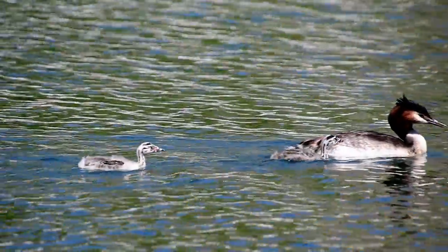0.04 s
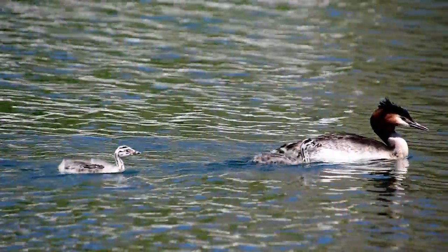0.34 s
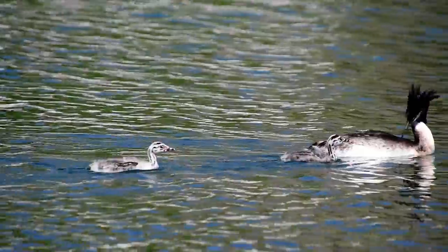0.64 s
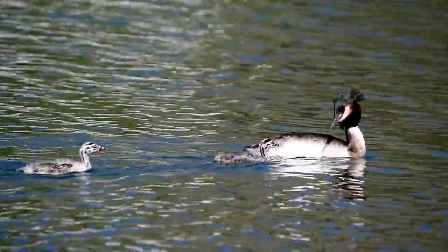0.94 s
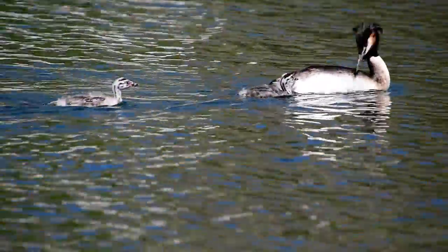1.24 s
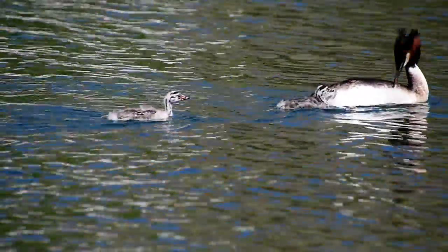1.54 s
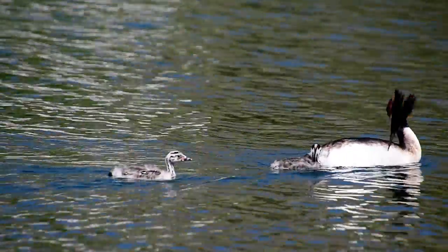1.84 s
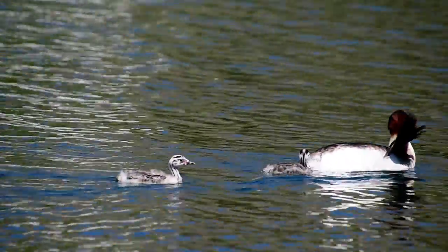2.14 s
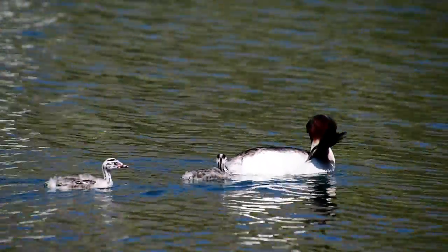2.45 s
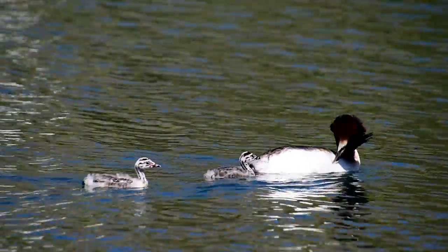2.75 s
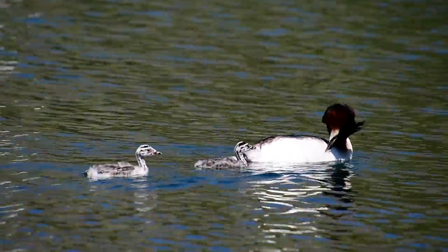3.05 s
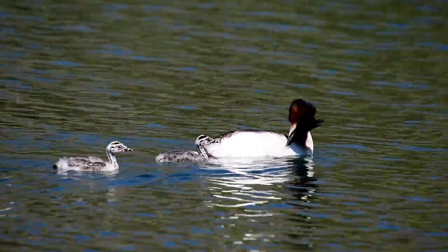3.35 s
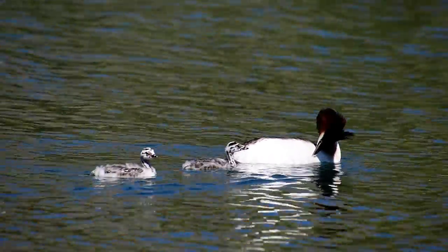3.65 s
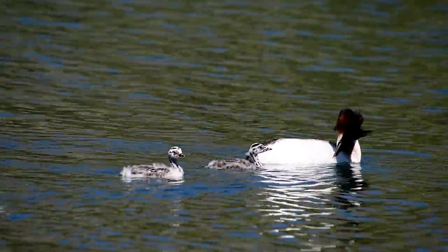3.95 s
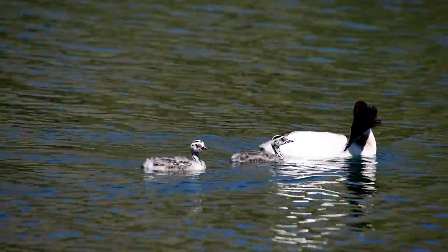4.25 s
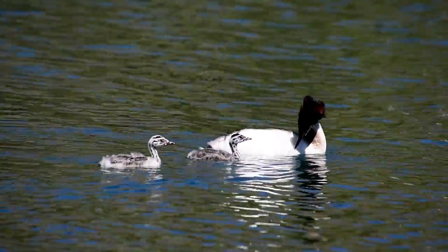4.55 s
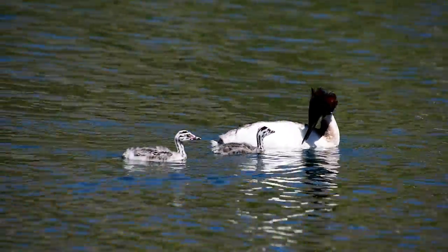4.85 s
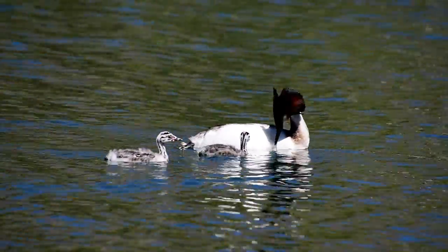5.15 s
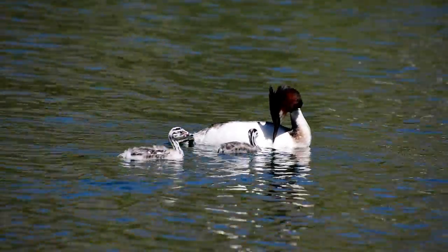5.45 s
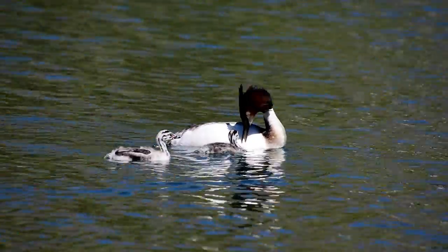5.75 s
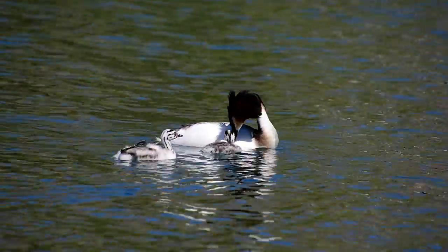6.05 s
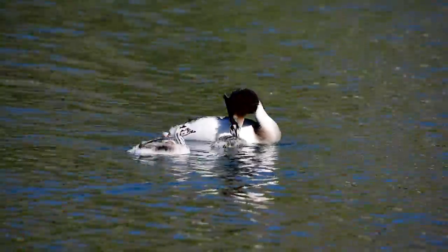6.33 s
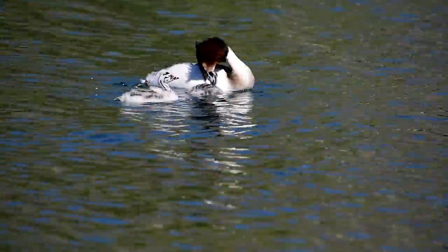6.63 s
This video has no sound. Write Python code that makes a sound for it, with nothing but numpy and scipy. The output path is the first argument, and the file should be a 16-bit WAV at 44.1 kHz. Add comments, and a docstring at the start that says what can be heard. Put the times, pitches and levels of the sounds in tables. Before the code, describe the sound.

On a lake, a grebe chick close by gives a sharp, high peep about once a second, and another answers more faintly further out. Soft nasal waterbird whines and distant songbird chirps, trills and buzzes continue throughout. Early on, the hand-held microphone rustles, bumps and clicks loudly twice, then hisses briefly. A faint far motor slowly grows under the quiet outdoor hush.

```python
"""Grebe chicks beg on a lake: one peeps sharply close by, another further out.
Waterbirds whine across the water; songbirds chip, trill, wheeze and flute on the bank.
Each call is a wavering membrane tone with a diffuse echo off water and banks.
A far motor hums under the outdoor hush. The hand-held camera rustles, bumps,
clicks (twice loudly) and hisses for a moment."""
import sys
import numpy as np
from scipy import signal
from scipy.fft import rfft, irfft, next_fast_len
from scipy.io import wavfile
from scipy.ndimage import uniform_filter1d

SR = 44100
rng = np.random.default_rng(int(sys.argv[2]) if len(sys.argv) > 2 else 0)


def generate_wav(signal):
    """Clip the signal to [-1, 1] and save it as 16-bit WAV at the path in sys.argv[1]."""
    frames = np.transpose(np.atleast_2d(signal))
    scaled = np.clip(frames, -1, 1) * 32767
    pcm = np.round(scaled).astype(np.int16)
    wavfile.write(sys.argv[1], SR, pcm)


N = 295029
T = np.arange(N) / SR

# direction of the far birds: f/Hz, left minus right/dB
BANK_PAN = [(500, -4), (1300, -9), (1600, 5), (2000, -14.5), (2600, -18), (3200, 12), (3900, 3.5),
            (4450, -12), (5200, -6), (7000, -1)]
# stereo width of diffuse noise: f/Hz, side minus mid/dB
DIFFUSE_SIDE = [(60, -106), (250, -103), (600, -10), (1200, 0), (2000, 4), (15000, -1)]


def undb(db):
    return 10 ** (np.asarray(db) / 20)


def unit(x):
    return x / np.sqrt(np.mean(x ** 2))


def curves(rows, at):
    """Table columns, interpolated along the first."""
    first, *columns = np.transpose(rows)
    return [np.interp(at, first, c) for c in columns]


def gains(points, size):
    """Gain per FFT bin from (f/Hz, level/dB) points."""
    hz, db = np.transpose(points)
    bin_hz = np.arange(size // 2 + 1) * SR / size
    return undb(np.interp(np.log(bin_hz + 1), np.log(hz), db))


def colour(x, points):
    """Filter by (f/Hz, level/dB) points."""
    size = next_fast_len(x.shape[-1] + 4096, True)
    return irfft(rfft(x, size) * gains(points, size), size)[..., :x.shape[-1]]


def noise(points):
    return unit(colour(rng.standard_normal(N), points))


def walk(rate_hz):
    """Random drift, spread near 1."""
    knots = rng.standard_normal(8192)
    return np.interp(T * rate_hz, np.arange(len(knots)), knots)


def add(out, start_s, x):
    i = int(start_s * SR)
    x = x[max(-i, 0):max(N - i, 0)]
    out[max(i, 0):max(i, 0) + len(x)] += x


def envelope(t, length_s, attack_s, release_s):
    return np.clip(t / attack_s, 0, 1) * np.clip((length_s - t) / release_s, 0, 1)


def swells(rows, attack_s, release_s, fade_db_per_s=0):
    """Gain over time from (t/s, length/s, level/dB) rows."""
    gain = np.zeros(N)
    for start_s, length_s, db in rows:
        t = T - start_s
        fade_db = fade_db_per_s * np.clip(t, 0, length_s)
        gain += envelope(t, length_s, attack_s, release_s) * undb(db - fade_db)
    return gain


def ports(x, pan, lag_samples):
    """Two microphone ports, shaded by frequency; the left lags."""
    left = colour(x, [(hz, db / 2) for hz, db in pan])
    right = colour(x, [(hz, -db / 2) for hz, db in pan])
    return np.array([np.interp(T - lag_samples / SR, T, left), right])


def shore(x, wet_db, t60_s):
    """Water and banks scatter a call into a short diffuse tail."""
    t = T[:SR // 2]
    tail = rng.standard_normal((2, len(t))) * undb(-60 * t / t60_s) * np.clip(t / 0.0009, 0, 1)
    tail /= np.sqrt(np.sum(tail ** 2, axis=1, keepdims=True))
    return undb(wet_db) * signal.fftconvolve(x[None], tail, axes=1)[:, :N]


def syrinx(hz, db, overtone_db, slope_db, jitter, flutter_db, harmonics=3):
    """Trembling membrane: pitch and level waver; overtones step by slope_db each."""
    size = len(hz)
    drift = uniform_filter1d(uniform_filter1d(rng.standard_normal((2, SR // 4)), size=60), size=60)
    tremble = unit(drift[0])[:size]
    flutter = unit(uniform_filter1d(drift[1], size=200))[:size]
    hz = uniform_filter1d(hz, size=130) * (1 + jitter * tremble)
    phase = 2 * np.pi * np.cumsum(hz) / SR
    tone = np.sin(phase)
    for k in range(2, harmonics + 1):
        tone += undb(overtone_db + slope_db * (k - 2.5)) * np.sin(k * phase) * (k * hz < SR / 2)
    gate = signal.windows.tukey(size, min(0.0028 * SR / size, 1))
    return np.sqrt(2) * tone * undb(db + flutter_db * flutter) * gate


def slur(length_s, start_hz, end_hz, db, edge_db, jitter, arch=0.0294):
    """Songbird note: a glide bowed upward by the share arch, ends lowered by edge_db."""
    share = np.linspace(0, 1, int(length_s * SR))
    edge = (2 * share - 1) ** 2
    hz = (start_hz + (end_hz - start_hz) * share) * (1 + arch * (1 - edge))
    return syrinx(hz, db - edge_db * edge, overtone_db=-42, slope_db=-5, jitter=jitter, flutter_db=4)


def hush():
    """Outdoor noise, mono in the bass."""
    spectrum = [(25, -20), (40, -6), (76, 0.5), (134, -3), (185, 4.5), (236, -4), (363, -3.5), (624, -10.5),
                (988, -6.5), (2410, -13), (3920, -8.5), (5430, -18.5), (7310, -23.5), (15500, -25)]  # f/Hz, level/dB
    mid = noise(spectrum)
    side = colour(noise(spectrum), DIFFUSE_SIDE)
    return np.array([mid + side, mid - side]) * undb(-53 + 0.87 * walk(5.1))


def motor():
    """Far motor, slowly growing: shaft speed wanders, the air makes it swell and fade."""
    levels = [(0, -71.5, -82), (2.7, -60.5, -54.5), (4.4, -65.5, -55), (5, -59, -53), (6.69, -56, -48)]  # t/s, hum/dB, drone/dB
    hum_lines = [(92, -0.35), (186, -1.2)]  # f/Hz, level/dB
    drone_spectrum = [(100, -29), (270, -1.5), (480, -11), (620, -5.5), (750, 5), (900, -0.5), (1150, -13),
                      (1600, -20), (4000, -37.5)]  # f/Hz, level/dB
    hum_db, drone_db = curves(levels, T)
    shaft_s = np.cumsum(1 + 0.0095 * walk(9)) / SR
    hum = sum(np.sin(2 * np.pi * hz * shaft_s) * undb(db + 1.05 * walk(18)) for hz, db in hum_lines)
    drone = noise(drone_spectrum) * undb(drone_db + 2.8 * walk(24))
    return hum * undb(hum_db) + ports(drone, [(300, 9), (750, -4), (1500, -8.5)], lag_samples=3.2)


def chorus(count=260):
    """Many far birds: random slurs, their echo and a wash of farther song."""
    levels = [(0, -41.5), (.4, -49.5), (.8, -51), (1.6, -45), (2, -51), (2.6, -53.5), (3.4, -51.5),
              (5.2, -45.5), (5.8, -51.5), (6.69, -43.5)]  # t/s, level/dB
    wash_spectrum = [(1500, -15), (2700, 3), (3300, 3), (4100, 8), (4800, -1), (5600, -4.5), (6300, -33),
                     (7200, -38), (10000, -45)]  # f/Hz, level/dB
    slurs = np.zeros(N)
    for when, pitch, glide, span, distance in rng.random((count, 5)):
        along = np.linspace(-1, 1, int((.018 + .035 * span) * SR))
        hz = 3200 * 2 ** (1.05 * pitch + .5 * (glide - .65) * along - .12 * along ** 2)
        db = -5 * distance - 5 * along ** 2
        note = syrinx(hz, db, overtone_db=-35, slope_db=-15, jitter=.01, flutter_db=2.5)
        add(slurs, when * T[-1], note)
    heard = ports(slurs, BANK_PAN, lag_samples=6) + shore(slurs, wet_db=1, t60_s=.5)
    voices = unit(colour(heard, [(2500, -3), (4000, 1), (6300, -2.5), (7200, -17), (9000, -30)]))
    wash = unit(colour(rng.standard_normal((2, N)), wash_spectrum))
    return (undb(-3) * voices + undb(-4.5) * wash) * undb(curves(levels, T)[0])


def chips():
    """Quick single songbird slurs."""
    notes = [(0, 0.029, 3950, 4470, -46), (0.296, 0.013, 3660, 3790, -43), (0.46, 0.031, 2600, 2634, -46.5),
             (0.593, 0.051, 5320, 3460, -46.5), (0.769, 0.031, 3910, 4450, -47.5),
             (1.167, 0.05, 2050, 2200, -50.5), (2.615, 0.045, 1305, 1194, -51.5),
             (3.016, .035, 3800, 3490, -42.5), (3.02, 0.044, 2064, 2300, -52),
             (5.09, 0.021, 5600, 5520, -40), (5.642, 0.027, 3950, 5000, -47)]  # t/s, length/s, start/Hz, end/Hz, level/dB
    out = np.zeros(N)
    for start_s, length_s, start_hz, end_hz, db in notes:
        add(out, start_s, slur(length_s, start_hz, end_hz, db, edge_db=4, jitter=0.013))
    return ports(out, BANK_PAN, lag_samples=4) + shore(out, wet_db=-4, t60_s=0.22)


def near_chick(whistle_s=.035):
    """An overtone-rich lead-in leaps to a loud whistle, drops and ends in a warble."""
    # peep shape: stage (0 start, 1 leap, 2 drop, 3 end), f/Hz, level/dB, overtones/dB
    contour = [(0, 3120, -32.5, 7.5), (.85, 3480, -12, -8.5), (1.2, 4610, -3, -17.5),
               (1.85, 4690, -5, -16.5), (2.07, 3530, -14, -15), (2.16, 4380, -10, -8),
               (2.35, 3400, -8, -26), (2.78, 3950, -10, -17), (3, 3000, -10.5, -22)]
    # t/s, lead-in/s, tail/s, level/dB, lead-in gain/dB, lead-in overtone slope/dB,
    # later overtone gain/dB, roughness/0-1
    peeps = [(0.078, 0.051, 0.068, -33.5, 3, -9, -4, 0.74),
             (1.774, 0.05, 0.061, -28, 1.5, -14.5, 2.5, 0.28),
             (3.123, .054, 0.055, -30, 5, -17.5, -2.5, 0.32), (4.223, 0.045, 0.058, -32, 4, -15.5, 0, 0.52),
             (5.423, .05, 0.061, -40, 9, -18.5, -0.5, 0.79), (6.533, .048, 0.066, -24.5, 5, 5.5, 1.5, 0.56)]
    throat = [(4700, -1), (5600, 3.5), (6650, 0), (7800, -7), (9400, 0), (10000, -3), (11000, -5.5),
              (15000, -13)]  # throat and beak resonances: f/Hz, gain/dB
    pan = [(2000, 3), (3400, -9), (4000, -15), (4600, -11.5), (5500, -3), (6700, 1), (8000, -7.5),
           (9400, -15), (11000, 1)]  # f/Hz, left minus right/dB
    out = np.zeros(N)
    for start_s, lead_s, tail_s, db, lead_db, lead_slope_db, bright_db, rough in peeps:
        marks_s = np.cumsum([0, lead_s, whistle_s, tail_s])
        stage = np.interp(T[:int(marks_s[-1] * SR)], marks_s, np.arange(4))
        hz, shape_db, overtone_db = curves(contour, stage)
        lead = np.clip((1 - stage) / 0.45, 0, 1)
        level_db = db + shape_db + lead_db * lead
        overtone_db += bright_db * (1 - lead)
        slope_db = lead_slope_db * lead - 8 * (1 - lead)
        peep = syrinx(hz, level_db, overtone_db, slope_db, jitter=.028 * rough, flutter_db=4 * rough)
        add(out, start_s, peep)
    out = colour(out, throat)
    duller = colour(out, [(5000, 2), (7000, -0.81)])
    return ports(out, pan, lag_samples=8.18) + shore(duller, wet_db=-4.5, t60_s=0.26)


def whines(rise_s=.024, start_ratio=.84, end_hz=1350):
    """Hoarse nasal waterbird calls: arch up, loudest at the top, sag to one resting pitch."""
    calls = [(.192, .08, 1900, -48.5, -1.5), (.452, 0.07, 2200, -53.5, 4.5), (.713, 0.025, 1765, -56, -7),
             (2.231, 0.088, 1996, -63.5, 7), (2.508, 0.058, 1836, -61, -0.5), (3.491, 0.065, 2205, -56, -5),
             (4.026, .085, 1920, -55.5, -6), (4.502, .085, 2074, -56.5, -2), (5.006, 0.091, 2040, -55, -6),
             (5.498, 0.076, 2016, -60.5, 6), (5.909, 0.064, 1707, -53.5, -8),
             (6.016, 0.053, 2160, -55.5, 2.5), (6.297, 0.073, 1770, -64, -5),
             (6.527, 0.1, 2006, -60.5, 5.5)]  # t/s, fall/s, top/Hz, level/dB, overtones/dB
    out = np.zeros(N)
    for start_s, fall_s, top_hz, db, overtone_db in calls:
        t = T[:int((rise_s + fall_s) * SR)]
        onset = np.clip(1 - t / rise_s, 0, 1)
        sag = np.clip((t - rise_s) / fall_s, 0, 1)
        hz = top_hz * (1 - (1 - start_ratio) * onset ** 1.605) + (end_hz - top_hz) * sag ** .9
        level_db = db - 3 * onset - 8.5 * sag
        call = syrinx(hz, level_db, overtone_db, slope_db=-5, jitter=.024, flutter_db=3.6, harmonics=4)
        add(out, start_s, call)
    out = colour(out, [(1500, 9), (6300, -2), (7300, -25), (10000, -30)])
    return ports(out, BANK_PAN, lag_samples=8.7) + shore(out, wet_db=-8, t60_s=0.12)


def trills():
    """Songbirds repeat one falling note evenly, each from its place on the bank."""
    # first/s, last/s, spacing/s, note length/s, start/Hz, end/Hz, level/dB, growth/dB,
    # left minus right/dB
    runs = [(0.263, 0.376, .058, .024, 6170, 5300, -54.5, 1, -1.5),
            (3.614, 4.2, .117, .022, 6400, 5020, -59, 6, -1.5),
            (5.028, 5.548, .131, 0.029, 4254, 3610, -39, 0, 9.5),
            (5.647, 6.107, .076, 0.0206, 3400, 2700, -48.5, 1, 14.5),
            (6.199, 6.459, .0645, 0.021, 3020, 2830, -49, -1, 13)]
    out = np.zeros((2, N))
    for first_s, last_s, spacing_s, length_s, start_hz, end_hz, db, growth_db, pan_db in runs:
        span_s = last_s - first_s
        for share in np.linspace(0, 1, round(span_s / spacing_s) + 1):
            level_db = db + growth_db * (share - .5)
            note = slur(length_s, start_hz, end_hz, level_db, edge_db=11.5, jitter=0.019)
            for channel, side in zip(out, (.5, -.5)):
                add(channel, first_s + span_s * share, note * undb(side * pan_db))
    return out + shore(out.mean(axis=0), wet_db=-2.5, t60_s=0.54)


def rustle(ticks_per_s=300):
    """Skin rubs the plastic camera: fading noise with tiny ticks."""
    rubs = [(.85, 1, -47), (1.33, 0.54, -49)]  # t/s, length/s, level/dB
    spectrum = [(80, -19), (200, 0.5), (600, -1.5), (1200, -0.5), (1700, -1), (2300, -5.5), (3500, -5),
                (6000, -13.5), (9500, -13), (11000, -26), (15000, -36)]  # f/Hz, level/dB
    mid = noise(spectrum)
    side = .5 * colour(noise(spectrum), DIFFUSE_SIDE)
    friction = np.array([mid + side, mid - side]) * undb(3.3 * walk(44.87))
    grains = (rng.random(N) < ticks_per_s / SR) * rng.standard_normal((2, N))
    ticks = unit(colour(grains, [(1000, -19), (7000, 2), (10000, -3), (14000, -10)]))
    rubbing = swells(rubs, attack_s=0.092, release_s=0.16, fade_db_per_s=20.5)
    return (friction + undb(-11) * ticks) * rubbing


def rumble(tremor_db=-77):
    """Moving the camera shakes its body, over a faint steady tremor."""
    moves = [(1, .09, -52), (3.05, 0.57, -64), (5.17, 0.35, -65), (6.2, 0.31, -62)]  # t/s, length/s, level/dB
    gain = undb(tremor_db) + swells(moves, attack_s=0.11, release_s=0.15)
    return noise([(15, -25), (35, 3), (70, 5), (150, -22), (600, -52)]) * gain


def bumps(attack_s=0.0044):
    """Dull thuds through the camera body."""
    hits = [(1.017, -35, 0.11, 165), (1.036, -42.5, 0.23, 65), (1.2484, -28.5, 0.04, 520),
            (1.361, -43, 0.06, 140), (3.247, -45.5, 0.067, 129), (3.644, -40, 0.072, 237.5),
            (5.349, -38, 0.099, 272), (6.376, -31.5, 0.089, 155), (6.39, -38.5, 0.29, 65)]  # t/s, level/dB, t60/s, f/Hz
    out, t = np.zeros(N), T[:SR // 3]
    for start_s, db, t60_s, hz in hits:
        resonance = [(hz / 4, -20), (hz, 0), (hz * 2, -7), (hz * 10, -40), (hz * 40, -70)]
        ring = unit(colour(rng.standard_normal(len(t)), resonance))
        add(out, start_s, ring * undb(db - 60 * t / t60_s) * np.clip(t / attack_s, 0, 1))
    return out


def clicks(size=4096):
    """A snap and a few milliseconds of rattle ring the camera housing."""
    hits = [(1.0208, -26, 0.01, 23), (1.2492, -13.5, 0.01, 0.5), (1.3602, -7.5, 0.0044, 4),
            (6.215, -48, .02, -2), (6.278, -48, 0.022, 3), (6.384, -32, 0.021, 19)]  # t/s, level/dB, t60/s, treble left minus right/dB
    spectra = [
        [(100, -36), (600, -29), (1200, 2), (1700, 10.5), (2600, -20), (6000, -24), (15000, -45)],
        [(60, -33), (140, -3), (330, -11), (550, 4), (900, -9), (1400, -3.5), (1770, 3), (2300, -8.5),
         (3900, -6), (5300, -32), (7500, -15.5), (8700, -17.5), (11000, -32), (15000, -52)],
        [(59, -51), (100, -13), (691, -7.5), (1310, -8.5), (2130, -5), (2800, 4), (3620, -8), (5420, -1.5),
         (6420, 3.5), (6990, 0), (8830, -3.5), (10200, -15), (11200, -48), (14700, -19), (16000, -30)],
        [(1000, -21), (6500, -23), (8700, 8), (11000, -26)],
    ]  # tap, knock, snap, tick; each f/Hz, level/dB
    kinds = [0, 1, 2, 3, 3, 0]  # spectrum index per hit
    out, t = np.zeros((2, N)), T[:size]
    causal_fold = np.r_[1, np.full(size // 2 - 1, 2), np.zeros(size // 2)]
    for (start_s, db, t60_s, pan_db), kind in zip(hits, kinds):
        cepstrum = irfft(np.log(gains(spectra[kind], size)))
        housing = np.exp(rfft(cepstrum * causal_fold))  # minimum phase
        decay = undb(-60 * t / t60_s) + undb(-12.5 - 60 * t / 0.025)
        rattle = 0.19 * rng.standard_normal((2, size)) * decay
        force = rattle[0] + (t == 0)
        # both ports feel the same bass; the treble leans to one side
        lean = (undb(pan_db) - 1) / (undb(pan_db) + 1)
        sideways = colour(1.2 * rattle[1] + lean * force, [(600, -34), (1400, -4), (2500, 0)])
        mid, side = irfft(rfft(np.array([force, sideways])) * housing)
        gain = undb(db) / np.sqrt(np.sum(mid ** 2) / (.001 * SR))  # energy referred to 1 ms
        add(out[0], start_s, (mid + side) * gain)
        add(out[1], start_s, (mid - side) * gain)
    return out


def far_chick():
    """Two-step falling peeps, blurred by distance."""
    contour = [(0, 3660, -4.5), (.12, 4350, -2), (.3, 4500, -2), (.45, 4270, -2.5), (.51, 3695, -6),
               (.6, 3817, 8), (.72, 3750, 7.5), (.86, 3140, 3.5), (1, 2830, 7.5)]  # share of length, f/Hz, level/dB
    peeps = [(1.27, 0.086, 0.98, -49.5, -9), (1.988, 0.083, 1.01, -47, -17), (2.218, 0.084, 1, -53, -18),
             (2.738, 0.098, 0.98, -50, -5), (2.967, 0.081, 0.99, -52, -5), (4.136, 0.082, 1.02, -49, -11),
             (4.876, 0.092, 0.93, -53.5, -25), (5.684, 0.11, 0.95, -52, -14), (5.81, 0.092, 0.96, -54, -15)]  # t/s, length/s, pitch ratio, level/dB, start-to-end tilt/dB
    out = np.zeros(N)
    for start_s, length_s, ratio, db, tilt_db in peeps:
        share = np.linspace(0, 1, int(length_s * SR))
        hz, shape_db = curves(contour, share)
        level_db = db + shape_db + tilt_db * (share - .5)
        peep = syrinx(hz * ratio, level_db, overtone_db=-35, slope_db=-15, jitter=.04, flutter_db=3)
        add(out, start_s, peep)
    return ports(out, BANK_PAN, lag_samples=1) + shore(out, wet_db=1, t60_s=0.12)


def wheezes(knee_s=.27, flutter_hz=196.7, slowing_hz_per_s=76):
    """Songbird buzzes sink as their flutter slows; each flutter is one downward sweep."""
    calls = [(1.92, 0.66, 0.024, 4925, 4390, -52), (3.3, .86, 0.22, 4467, 3098, -44.5),
             (3.622, 0.15, 0.074, 4700, 4500, -44.5), (4.28, 0.58, .03, 4840, 4310, -58)]  # t/s, length/s, attack/s, start/Hz, end/Hz, level/dB
    out = np.zeros(N)
    for start_s, length_s, attack_s, start_hz, end_hz, db in calls:
        t = T[:int(length_s * SR)]
        centre_hz = end_hz + (start_hz - end_hz) / (1 + (t / knee_s) ** 3.2)
        cycle = np.cumsum(flutter_hz - slowing_hz_per_s * t) / SR % 1
        sweep_hz = 0.69 * (centre_hz - 2300) * (.5 - cycle)
        hz = centre_hz * (1 + 0.0136 * walk(300)[:len(t)]) + sweep_hz
        buzz = unit(np.sin(2 * np.pi * np.cumsum(hz) / SR) * np.sin(np.pi * cycle) ** 0.28)
        add(out, start_s, buzz * undb(db) * envelope(t, length_s, attack_s, release_s=0.12))
    return ports(out, BANK_PAN, lag_samples=10) + shore(out, wet_db=-4, t60_s=.2)


def hiss():
    """Brief flickering hiss close to the camera."""
    bursts = [(2.25, 0.92, -49.5), (3.05, 0.55, -59.5)]  # t/s, length/s, level/dB
    spectrum = [(1500, -41), (2500, 5.5), (3200, -34), (4800, 1), (5800, 6), (6900, -4), (7600, -2),
                (8050, -1), (8400, -1.5), (9100, -0.5), (9800, -3.5), (10450, -15), (11600, -9.5),
                (15000, -23)]  # f/Hz, level/dB
    pan = [(2500, 8.5), (4000, 0), (7000, -2), (8400, -4), (9400, -18), (10500, -9), (11800, -11),
           (14000, -1)]  # f/Hz, left minus right/dB
    gain = swells(bursts, attack_s=0.096, release_s=0.19)
    return ports(noise(spectrum), pan, lag_samples=1) * gain * undb(1.7 * walk(24.8))


def flutes():
    """Slow, nearly pure songbird notes far along the bank."""
    notes = [(4.394, 0.13, 1860, 2010, -56), (4.654, .07, 2230, 1900, -57), (4.729, 0.19, 2100, 2300, -58),
             (5.097, 0.1, 1724, 1900, -54.5), (5.255, 0.061, 2120, 2060, -52),
             (5.307, 0.097, 1800, 1647, -50.5)]  # t/s, length/s, start/Hz, end/Hz, level/dB
    out = np.zeros(N)
    for start_s, length_s, start_hz, end_hz, db in notes:
        add(out, start_s, slur(length_s, start_hz, end_hz, db, edge_db=0, jitter=.007, arch=0.0354))
    return ports(out, BANK_PAN, lag_samples=9.8) + shore(out, wet_db=-3, t60_s=0.47)


def scene():
    waterbirds = near_chick() + far_chick() + whines()
    songbirds = flutes() + trills() + chips() + wheezes() + chorus()
    camera = clicks() + bumps() + rumble() + rustle() + hiss()
    return waterbirds + songbirds + camera + hush() + motor()


def record(dry):
    """The recorder clips at full scale and cuts the top."""
    top_hz = 15900
    lowpass = signal.ellip(10, .2, 70, top_hz, fs=SR, output="sos")
    return signal.sosfilt(lowpass, np.clip(dry, -1, 1))


dry = scene()
out = record(dry)
generate_wav(out)
```